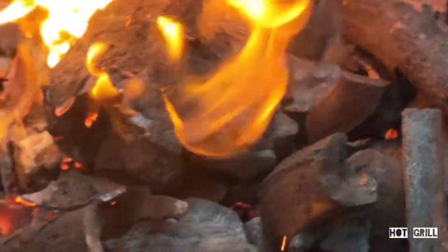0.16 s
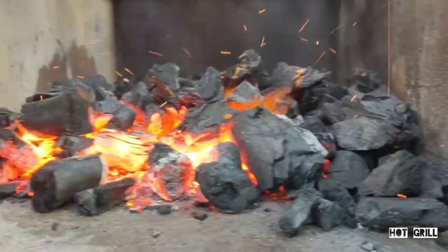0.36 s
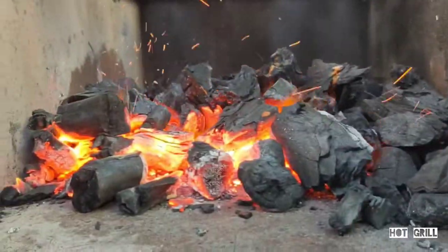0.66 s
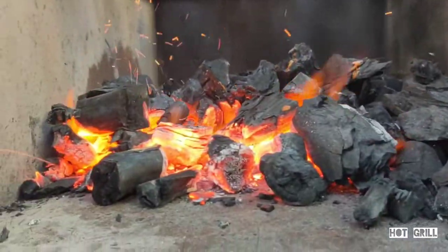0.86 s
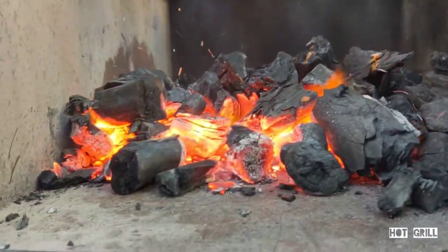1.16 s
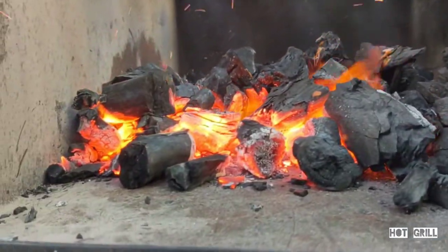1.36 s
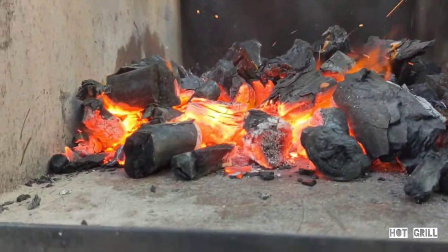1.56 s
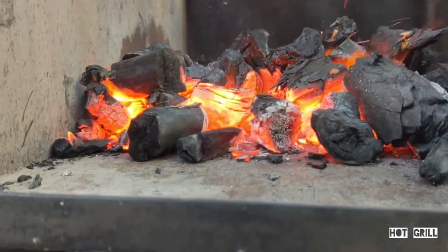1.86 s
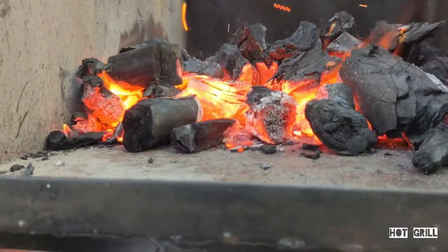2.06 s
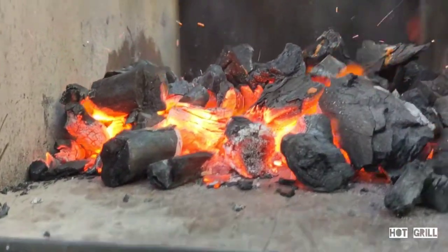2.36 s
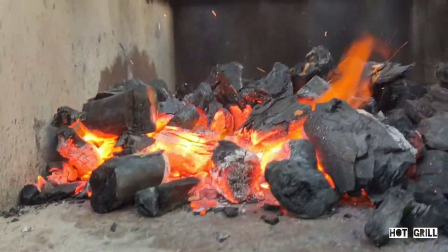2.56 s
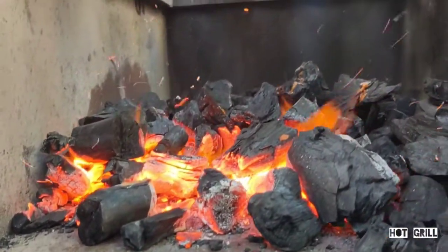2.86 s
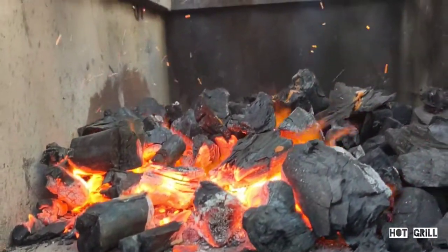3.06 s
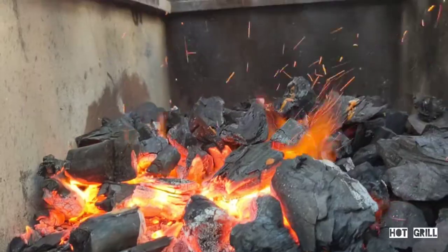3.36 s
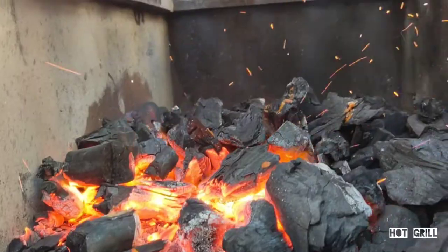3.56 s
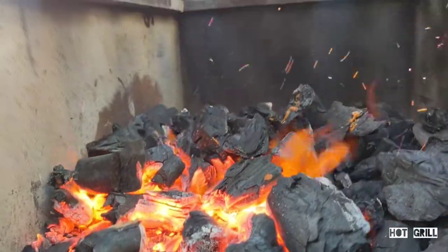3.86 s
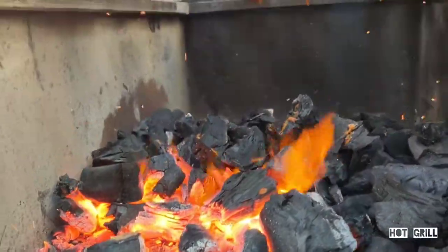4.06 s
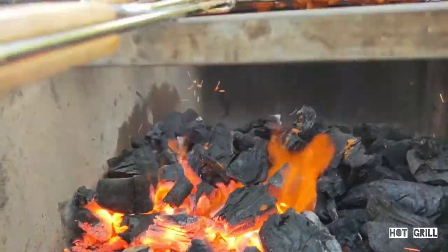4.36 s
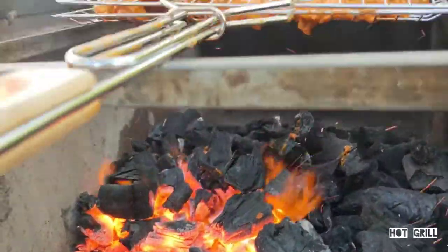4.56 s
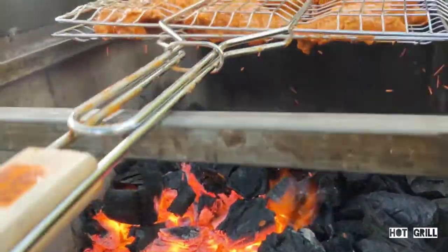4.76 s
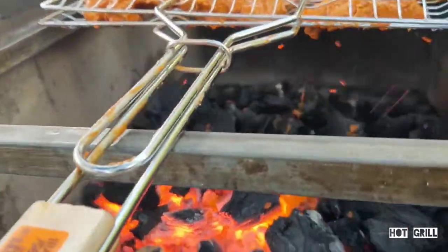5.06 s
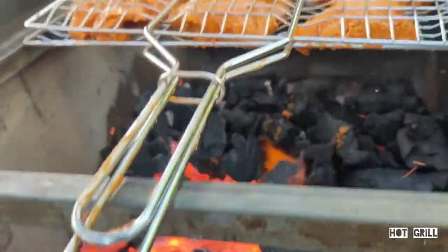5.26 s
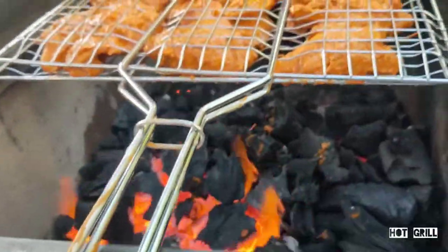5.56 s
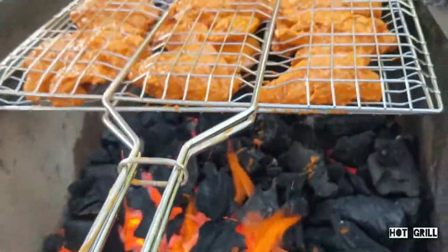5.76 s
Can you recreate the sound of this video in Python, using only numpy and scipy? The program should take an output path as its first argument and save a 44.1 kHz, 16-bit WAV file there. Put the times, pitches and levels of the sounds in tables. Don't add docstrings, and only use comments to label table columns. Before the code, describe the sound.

After a brief gritty scrape over coals and a short silence, charcoal snaps sharply over soft flame roar and gusty, thumping wind.

```python
import sys
import numpy as np
from scipy import signal
from scipy.fft import rfft, irfft, next_fast_len
from scipy.io import wavfile
from scipy.ndimage import uniform_filter1d

SR = 44100
rng = np.random.default_rng(int(sys.argv[2]) if len(sys.argv) > 2 else 0)


def waveform_to_disk(signal):
    frames = np.transpose(np.atleast_2d(signal))
    scaled = np.clip(frames, -1, 1) * 32767
    samples = np.round(scaled).astype(np.int16)
    wavfile.write(sys.argv[1], SR, samples)


def undo_db(level):
    steps = np.asarray(level, float) / 20
    return 10 ** steps


N = 261175
T = np.arange(N) / SR
LONG = next_fast_len(N, True)
HZ = np.fft.rfftfreq(LONG, 1 / SR)

# (time [s], peak [dB], brightness [dB], lump resonance [Hz], treble spit [dB])
POPS = [(0.7957, -5.5, 2.5, 910, -32), (0.9365, -11, -11, 1150, -50), (1.4807, -37.5, 11, 800, -43),
        (1.7555, -21.5, 0.5, 1800, -32.5), (1.8044, -28.5, 3, 1500, -39), (2.0469, -29, 6.5, 1160, -32.5),
        (2.3477, -12, -5, 1500, -36), (2.5178, -18.5, 0.5, 1300, -30), (2.7059, -21, -1.5, 1600, -44),
        (2.7308, -29, 2, 1800, -33.5), (2.9366, -13, -0.3, 1310, -28.5), (3.09, -25, 2, 1360, -32.5),
        (3.3539, -22, 6, 1330, -32), (3.3998, -30, -4, 1230, -33.5), (3.5026, -31, -4.5, 1270, -41.5),
        (3.8785, -26, 1.7, 1340, -51.5), (3.9663, -13.5, -0.5, 1217, -35.5),
        (4.252, -15.5, 3.5, 1220, -24.5), (4.2978, -18, -3, 1240, -36.5), (4.6591, -17, -1.5, 934, -26.5),
        (5.2466, -32.5, -8, 1100, -40.5), (5.5295, -25, 5.5, 883, -43.5), (5.8128, -20, 0.5, 1130, -17),
        (5.8408, -33.5, -4, 1086, -46)]
# (time [s], peak [dB], treble spit [dB])
SPARKS = [(.0209, -56, -40), (.1276, -40, -27.5), (1.0155, -47, -54), (1.079, -47, -59),
          (1.345, -33, -52.5), (1.4152, -39.5, -46.5), (1.57, -43, -37.5), (1.8923, -54, -52),
          (2.0141, -48.5, -39.5), (2.1158, -33, -52), (2.2524, -44.5, -49), (2.366, -49, -44),
          (2.9097, -38, -51.5), (2.9234, -56, -47), (2.953, -45, -29.5), (3.0616, -49, -51),
          (3.3355, -51.5, -44), (3.5852, -55, -44), (3.6964, -56, -49.5), (3.739, -38.5, -60),
          (4.459, -36, -42), (4.9902, -44, -43), (5.1538, -57.5, -50), (5.1926, -47, -38.5),
          (5.4591, -36, -55), (5.914, -34, -49)]
# (frequency [Hz], gain [dB])
POP_BODY = [(240, -35.5), (400, 0.5), (792, -1), (1090, -1), (1420, -7), (1770, -6.5), (2960, -14.5),
            (3140, -21.5), (3760, -33.5), (4660, -43.5), (5510, -43), (7000, -59.5), (9100, -85),
            (15400, -120)]
# (frequency [Hz], gain [dB])
SNAP_SPECTRUM = [(2820, -40.0), (4800, -23), (6920, -33.5), (9070, -15.0), (11000, -17.5), (13300, -3.5),
                 (15300, -2.5), (15900, -6.0), (16400, -46.5)]
# (time [s], roar level [dB])
FIRE_HEAT = [(.45, -53), (.63, -50), (.74, -48.5), (1.06, -50), (1.35, -50), (1.99, -46), (2.48, -48),
             (3.12, -49), (3.8, -51), (4.09, -47.5), (4.7, -47.5), (4.98, -48), (5.3, -46.5), (5.64, -48.5),
             (5.8, -48), (5.92, -42)]
# (frequency [Hz], density [dB/Hz])
ROAR_SPECTRUM = [(330, -34.5), (520, 1), (700, -13), (850, -7), (1000, -6.5), (1300, -6), (1550, -10),
                 (2000, -15), (2700, -21.5), (3400, -29), (4000, -38.5), (5000, -49), (6800, -64),
                 (9000, -87.5)]
# (frequency [Hz], density [dB/Hz])
FIZZ_SPECTRUM = [(3820, -62.5), (6500, -29.5), (7000, -31), (8760, -15), (11400, -11), (12900, -4),
                 (15100, -3), (15700, -1)]
# (time [s], strength [dB])
MEAN_WIND = [(.45, -35), (.75, -26.5), (2.2, -25), (2.6, -27), (3.7, -24.5), (4.0, -32.5), (4.25, -29.5),
             (4.36, -36.5), (5.05, -36), (5.23, -31.5), (5.3, -29), (5.34, -33), (5.45, -29), (5.58, -38.5),
             (5.68, -31), (5.78, -37), (5.84, -25.5), (5.92, -27)]
# (time [s], level over mean wind [dB])
GUSTS = [(.76, 5.5), (.94, 2), (1.27, 1), (1.3, -2.5), (1.4, 1.5), (1.46, 3.5), (1.49, -5), (1.55, 3.5),
         (1.76, -4.5), (2.03, -0.5), (2.065, -8), (2.14, -4), (2.18, 2.5), (2.67, 4), (2.78, 7), (2.88, 5),
         (2.93, -4), (3.08, 4.5), (3.22, 3.5), (3.31, 4.5), (3.34, -2.5), (3.44, -7.5), (3.61, 3),
         (3.67, -9.5), (3.76, 3), (3.855, 8), (3.94, 8), (4.1, 5), (5.27, 6.5), (5.83, 4)]
# (time [s], peak [dB], frequency [Hz])
THUMPS = [(1.487, -32.5, 172), (2.807, -12, 172), (3.729, -16.5, 281), (3.7382, -12, 294),
          (3.749, -13, 381), (3.766, -14, 299), (3.792, -6.5, 335), (3.853, -21.5, 237),
          (3.935, -11.5, 250), (4.093, -19.5, 230), (4.246, -8, 204), (5.248, -13.5, 202),
          (5.273, -5.5, 197.5), (5.291, -15, 107.6), (5.655, -20, 415), (5.823, -6.5, 245.5),
          (5.841, -17.5, 226.5), (5.86, -14.5, 260), (5.897, -16, 408)]
# (frequency [Hz], density [dB/Hz])
BUFFET_SPECTRUM = [(15, -48.5), (25, -28.5), (52, -13.5), (76, -1), (194, 0), (260, -4.5), (340, -14),
                   (570, -120)]
# (frequency [Hz], density [dB/Hz])
FLUTTER_SPECTRUM = [(120, -29.5), (200, -2), (406, -0.5), (714, -26.5), (882, -25.5), (1020, -38.5),
                    (1300, -30), (1500, -45.5), (1950, -48), (3300, -120)]
# (middle [s], half length [s], push [dB])
STROKES = [
    (0.104, 0.011, 7.),
    (0.184, 0.028, 0),
    (0.221, 0.03, 12.5),
]
# (frequency [Hz], density [dB/Hz])
RUMBLE_SPECTRUM = [(35, -66.5), (60, -35), (155, -15.5), (233, -6.5), (308, -12.5), (340, -19),
                   (520, -36.5), (680, -48.5), (1140, -120)]
# (frequency [Hz], density [dB/Hz])
SCRAPE_SPECTRUM = [(260, -49.5), (450, -4.5), (721, -9), (875, -5), (963, -10), (1030, -1.5), (1230, -15),
                   (1430, -6.5), (1700, -15.5), (1970, -8), (2570, -19.5), (3310, -18.5), (3820, -43.5),
                   (4500, -46.5), (5850, -70.5), (9900, -120)]
# (frequency [Hz], density [dB/Hz])
SIZZLE_SPECTRUM = [(2240, -29), (3800, 0.5), (4920, -8.5), (6570, -0.5), (10800, -7), (13300, -0.5),
                   (15700, -8.5), (16500, -16)]
# (time [s], frequency [Hz], level [dB])
HUM = [(3.93, 67.9, -51), (4.0, 66.7, -30), (4.3, 66.8, -33), (4.8, 68, -38.5), (5.05, 67, -42.5),
       (5.25, 67.5, -58)]
# (time [s], firing rate [Hz], level [dB])
REV = [(4.5, 100, -66), (4.54, 98.2, -48.5), (4.61, 100.7, -51.5), (4.73, 89.4, -56), (4.8, 87, -55),
       (4.9, 85.3, -56), (4.96, 88, -57.5), (5.0, 86.4, -54)]
# (frequency [Hz], width [Hz], peak [dB])
EXHAUST = [(1150, 70, 2), (1610, 170, 6), (1850, 100, -2)]
# (time [s], frequency [Hz], level [dB])
WHINE = [(5.11, 1014, -59), (5.15, 1065, -56), (5.2, 1090, -53), (5.27, 1096, -43.5), (5.3, 1025, -49.5),
         (5.38, 1055, -58), (5.42, 1065, -63)]
# (time [s], frequency [Hz], level [dB])
BASKET = [(5.63, 407.3, -46), (5.634, 418, -58.5), (5.662, 397, -25.5), (5.726, 432, -32),
          (5.748, 430, -38), (5.78, 402, -57)]
# (frequency [Hz], signed share)
STEER = [(350, 1.0), (430, .8), (520, .13), (610, -.35), (760, -.58), (950, -.37), (1120, 0.0), (1330, .25),
         (1470, .02), (1730, 0.0), (1950, -.06), (2300, -.04), (2450, .025), (2750, 0.0)]
# (frequency [Hz], level [dB])
LEAK = [(300, -32), (600, -38), (1500, -34), (3000, -38), (6500, -32), (10000, -45), (16000, -50)]
# (time [s], share of plain left)
MONO = [(.4, 0), (.41, 1), (.89, 0.99), (.99, 0.61), (1.12, 0)]

SPARK_HZ, SPARK_BRIGHT_DB = 1150.0, -1
CRACKS = POPS + [(s, db, SPARK_BRIGHT_DB, SPARK_HZ, spit_db) for s, db, spit_db in SPARKS]
EDGE_HZ = 15800
CUT_S, FULL_S = 0.2956, 0.57
BACK_S = 3.6


def pops():
    out = np.zeros(N)
    hz = np.fft.rfftfreq(2048, 1 / SR)
    t = np.arange(3000) / SR
    draws = rng.standard_normal((len(CRACKS), 2, len(t)))
    sparse = (abs(draws[:, 1]) > 2.1) * np.sign(draws[:, 1]) * (t > 0.0007)
    scatter = sparse * undo_db(-2 - 60 * t / 0.021)
    scatter = scatter + draws[:, 0] * undo_db(-35.5 - 60 * t / 0.13)
    scatter[:, 0] = 1
    for (s, db, bright_db, lump_hz, _), burst in zip(CRACKS, scatter):
        echo_share, delay_ms = (0.5, 3.2) if s < BACK_S else (0.95, 2.7)
        echo = np.exp(-((1000 * t - delay_ms) / 0.06) ** 2)
        echo = echo_share * echo / echo.sum()
        lump_db = 3.5 * np.exp(-np.log((hz + 1) / lump_hz) ** 2 / 0.1)
        tilt_db = bright_db * np.clip(np.log2((hz + 1) / 1500), 0, 1)
        pop = signal.fftconvolve(burst + echo, causal(read(POP_BODY, hz) + lump_db + tilt_db))
        left_db = db + 6 * (1 - np.interp(s, *np.transpose(MONO)))
        add(out, s + 0.00083, undo_db(left_db + 1.5) * pop / abs(pop).max())
    return out


def snaps():
    haze_db, haze_t60_s = -13, 0.039
    out = np.zeros(N)
    t = np.arange(2500) / SR
    decay = undo_db(-60 * t / 0.009) + undo_db(haze_db - 60 * t / haze_t60_s)
    envelope = (1 - np.exp(-t / 0.00022)) * decay
    spits = rng.standard_normal((len(CRACKS), len(t))) * envelope
    impulse = causal(read(SNAP_SPECTRUM, np.fft.rfftfreq(2048, 1 / SR)))
    spits = signal.fftconvolve(spits, impulse[None], axes=1)
    for (s, *_, db), spit in zip(CRACKS, spits):
        add(out, s + 0.00045, undo_db(db - 3.5) * spit / abs(spit).max())
    return out


def crackle_ticks():
    rate_hz = 90.0
    chance = rng.random(N)
    size = rng.exponential(1, N)
    white = rng.standard_normal(N)
    ticks = evened((chance < rate_hz / SR) * undo_db(2.6 * np.minimum(size, 2.4)))
    return evened(signal.lfilter([1], [1, -0.985], ticks) * np.sign(white))


def fire():
    roar_db = curves(FIRE_HEAT)[0]
    fizz_db = -67.5 + 0.5 * (roar_db + 46)
    fizz_db = fizz_db - 2.5 * switch(BACK_S, width_s=0.15)
    fizz_db = fizz_db - 11 * np.exp(-abs(T - FULL_S) / 0.12)
    ticks = crackle_ticks()
    out = 0
    for points, level_db, ticks_db, lick_db in (
            (ROAR_SPECTRUM, roar_db, -10.0, 1.3), (FIZZ_SPECTRUM, fizz_db, -9.0, 1.8)):
        crackle = evened(shaped(ticks, undo_db(read(points, HZ)) * (HZ < EDGE_HZ)))
        flames = undo_db(lick_db * flicker(30.0)) * noise(points)
        out = out + undo_db(level_db) * (flames + undo_db(ticks_db) * crackle)
    return fade(late_s=0.005) * out


def thumps():
    out = np.zeros(N)
    for s, db, hz in THUMPS:
        turns = np.arange(0, 5, hz / SR)
        puff = turns * np.exp(1 - turns * 1.8) * np.sin(2 * np.pi * turns ** 0.9)
        slap = 0.29 * puff * abs(puff) * np.cos(5 * np.pi * turns)
        add(out, s, undo_db(db) * (puff + slap))
    return out


def wind():
    shelter_s, calm_s = 4.33, 5.47
    gust_db = bells(GUSTS, half_s=0.018) + 1.07 * flicker(8.1)
    strength_db = curves(MEAN_WIND)[0] + gust_db
    flutter_db = np.where(T < shelter_s, -8.5 - 0.3 * gust_db, -1.5)
    eddies = flicker(62.0) * np.clip((strength_db + 41.5) / 14, 0.15, 1)
    buffet = evened(undo_db(1.8 * eddies) * noise(BUFFET_SPECTRUM))
    flutter = evened(undo_db(0.54 * eddies + 1.9 * flicker(53.0)) * noise(FLUTTER_SPECTRUM))
    share = np.clip(undo_db(flutter_db - 1.0), 0, 0.95)
    calm = undo_db(-6 * switch(calm_s, width_s=0.02))
    gust = np.sqrt(1 - share ** 2) * calm * buffet + share * flutter
    gust = evened(gust / (uniform_filter1d(gust ** 2, size=2600) + 0.05) ** 0.45)
    return fade(late_s=0.004) * undo_db(strength_db + 1.03) * gust + thumps()


def shovel():
    rumble_db, drag_db, hiss_db = -34.0, -44, -63.0
    push_db = sum(bells([(s, db)], half_s) for s, half_s, db in STROKES)
    grit = flicker(50.0)
    rumble = undo_db(rumble_db) * noise(RUMBLE_SPECTRUM)
    scrape = undo_db(drag_db + push_db + 1.6 * grit) * noise(SCRAPE_SPECTRUM)
    sizzle = undo_db(hiss_db + 0.3 * push_db + 3.1 * grit) * noise(SIZZLE_SPECTRUM)
    gate = np.clip((CUT_S - T) / 0.0047, 0, 1)
    return gate * (rumble + scrape + sizzle)


def basket():
    return tone(BASKET, waver_db=1.1)


def rev():
    rate_hz, db, gate = curves(REV)
    turns = np.cumsum(rate_hz * (1 + 0.0021 * flicker(6.8))) / SR
    sink = (rate_hz / 96) ** 0.37
    out = 0
    for k in range(11, 21):
        gain = 0
        for hz, width_hz, peak_db in EXHAUST:
            offset = 2 * (k * rate_hz - hz * sink) / width_hz
            gain = gain + undo_db(peak_db) / (1 + offset ** 2)
        harmonic = np.cos(2 * np.pi * (k * turns + rng.random()))
        out = out + gain * undo_db(3.8 * flicker(25.0)) * harmonic
    return gate * undo_db(db) * out


def engine():
    return rev() + tone(HUM, waver_db=0.37) + tone(WHINE, waver_db=1.8)


def tone(rows, waver_db):
    hz, db, gate = curves(rows)
    return gate * undo_db(db + 0.5 + waver_db * flicker(7.2)) * np.sin(2 * np.pi * np.cumsum(hz) / SR)


def noise(points):
    return evened(shaped(rng.standard_normal(LONG), undo_db(read(points, HZ)) * (HZ < EDGE_HZ)))


def flicker(top_hz):
    return evened(shaped(rng.standard_normal(LONG), (HZ > 3) / (1 + (HZ / top_hz) ** 2)))


def evened(x):
    return x / np.sqrt(np.mean(x ** 2) + 1e-30)


def shaped(x, gain):
    return irfft(rfft(x, LONG) * gain, LONG)[:N]


def causal(db):
    log_gain = np.log(undo_db(np.maximum(db, -90)))
    full = np.r_[log_gain, log_gain[-2:0:-1]]
    tap = np.fft.ifft(np.exp(np.conj(signal.hilbert(full)))).real
    return tap[:512] / np.linalg.norm(tap)


def read(points, hz):
    f, value = np.transpose(points)
    return np.interp(np.log(hz + 1), np.log(f + 1), value)


def curves(rows):
    s, *columns = np.transpose(rows)
    gate = uniform_filter1d(((T > s[0]) & (T < s[-1])) * 1.0, size=90)
    return [np.interp(T, s, c) for c in columns] + [gate]


def bells(rows, half_s):
    return sum(db * np.exp(-((T - s) / half_s) ** 2) for s, db in rows)


def switch(s, width_s):
    return 1 / (1 + np.exp((s - T) / width_s))


def fade(late_s):
    slope_db_per_s, knee_s = 569, 0.023
    rise_db = -slope_db_per_s * knee_s * np.logaddexp(0, (FULL_S - T) / knee_s)
    dip_db = -4.1 * np.exp(-abs(T - FULL_S) / late_s)
    return (T > 0.45) * undo_db(rise_db + dip_db)


def add(mix, s, sound):
    part = mix[round(s * SR):][:len(sound)]
    part += sound[:len(part)]


def scene():
    beds = snaps() + fire() + wind() + shovel() + basket() + engine()
    left = shaped(beds, 2 / (1 + read(STEER, HZ))) + pops()
    return np.array([left, left])


def low_pass(x):
    return signal.sosfilt(signal.butter(12, 16790, fs=SR, output="sos"), x)


def record(dry):
    taps = rng.standard_normal(300) * np.hanning(300)
    centred = np.roll(np.pad(taps, (0, LONG - 300)), -150)
    scramble = np.exp(1j * np.angle(rfft(centred)))
    steered = shaped(dry[1], read(STEER, HZ) + undo_db(read(LEAK, HZ)) * scramble)
    mono = np.clip(np.interp(T, *np.transpose(MONO)), 0, 1)
    right = mono * dry[1] + (1 - mono) * steered
    return low_pass(np.array([dry[0], right]))


dry = scene()
out = record(dry)
waveform_to_disk(out)
```